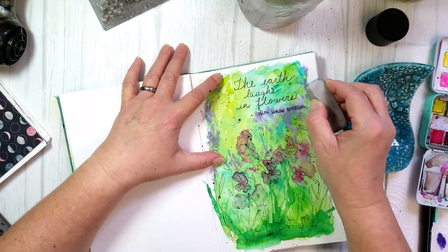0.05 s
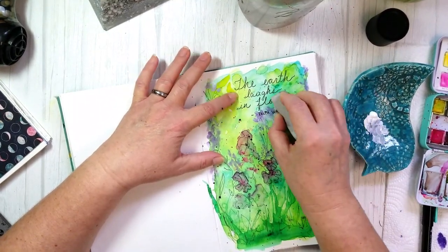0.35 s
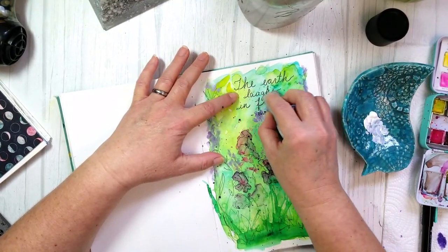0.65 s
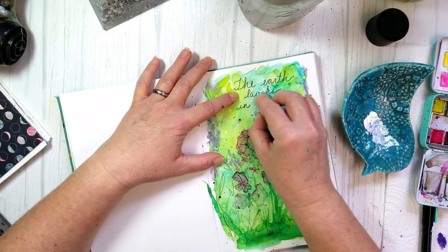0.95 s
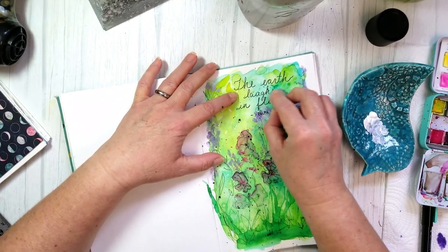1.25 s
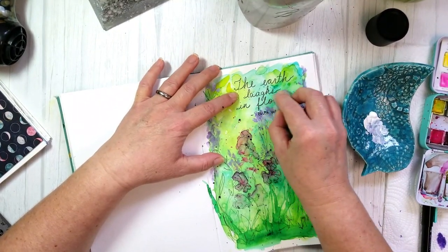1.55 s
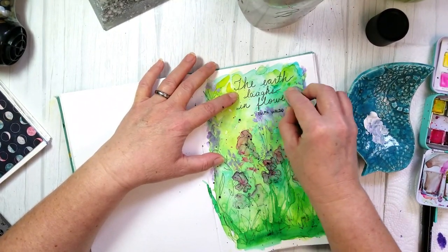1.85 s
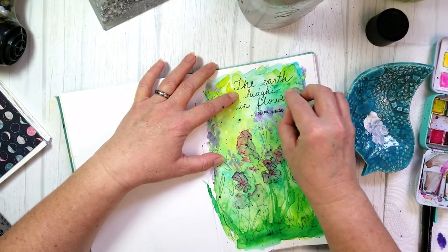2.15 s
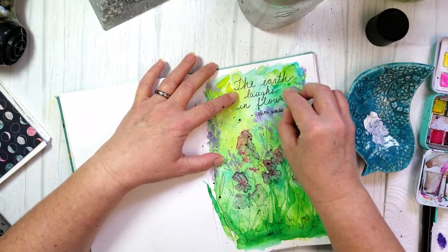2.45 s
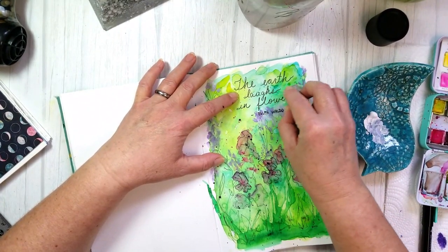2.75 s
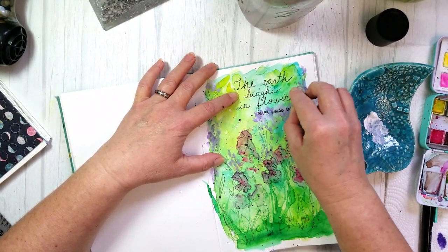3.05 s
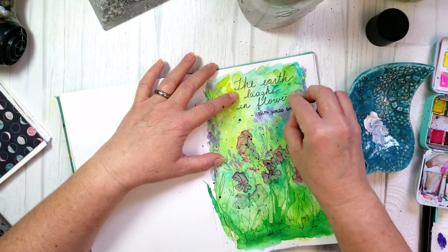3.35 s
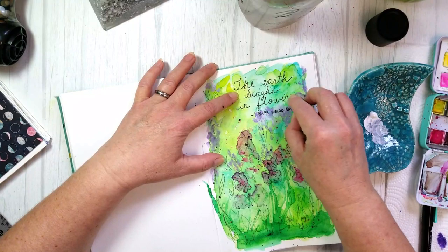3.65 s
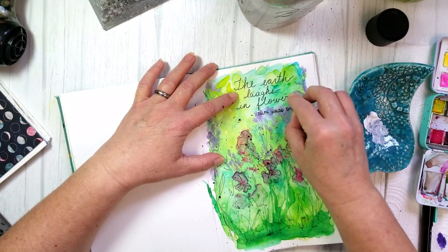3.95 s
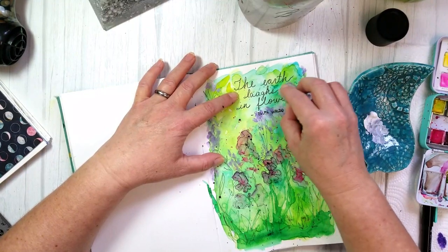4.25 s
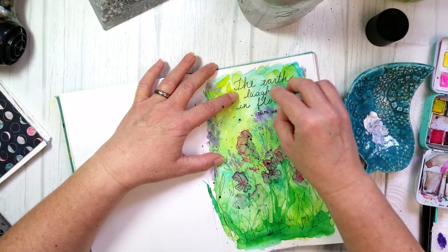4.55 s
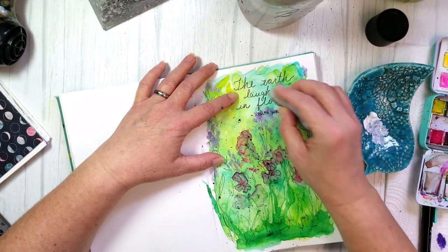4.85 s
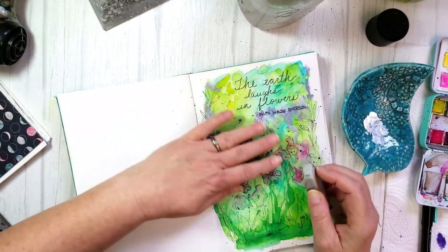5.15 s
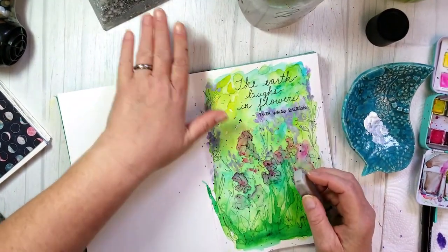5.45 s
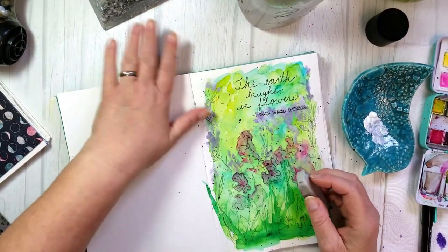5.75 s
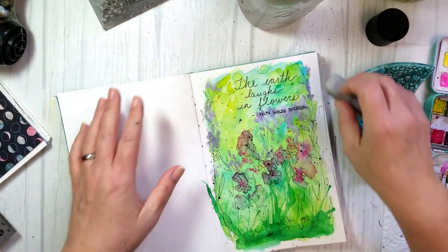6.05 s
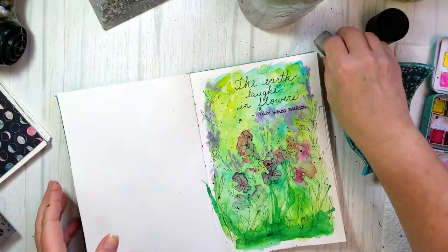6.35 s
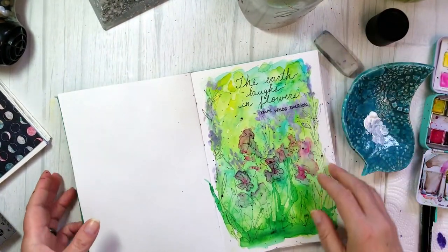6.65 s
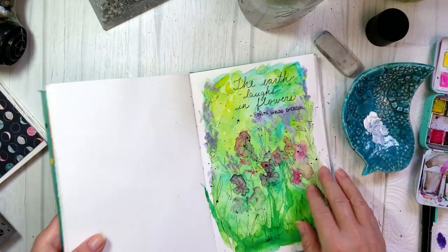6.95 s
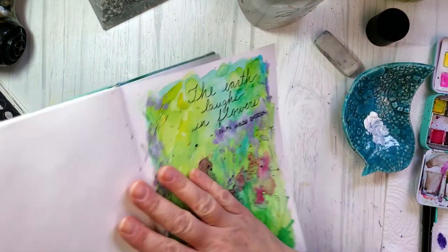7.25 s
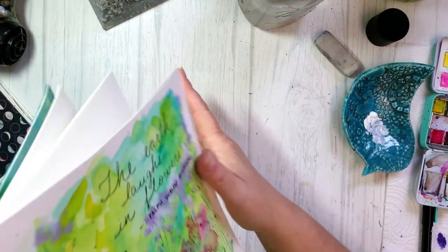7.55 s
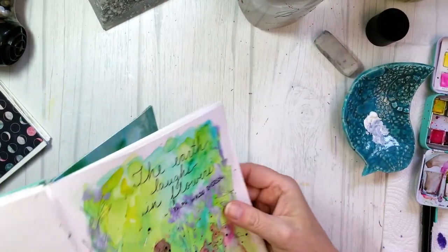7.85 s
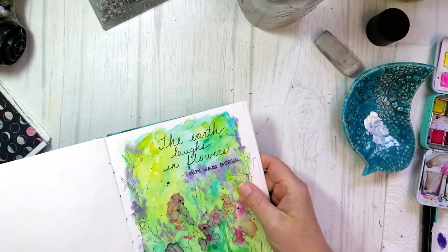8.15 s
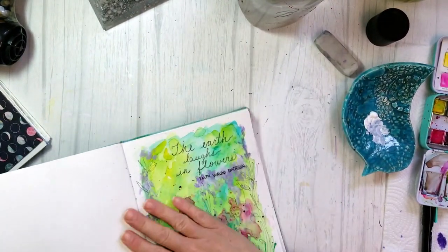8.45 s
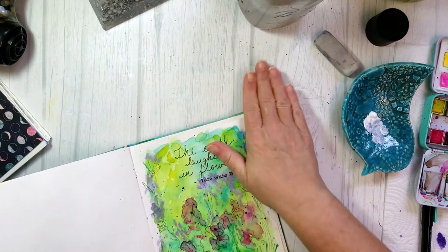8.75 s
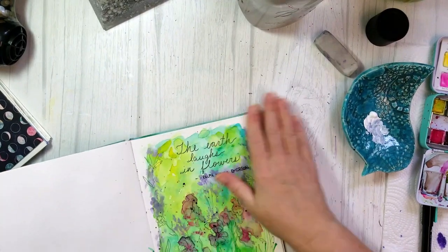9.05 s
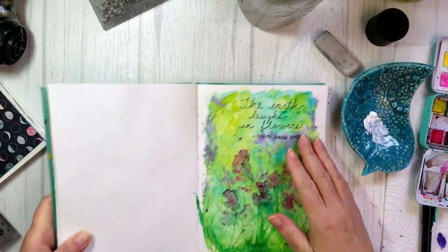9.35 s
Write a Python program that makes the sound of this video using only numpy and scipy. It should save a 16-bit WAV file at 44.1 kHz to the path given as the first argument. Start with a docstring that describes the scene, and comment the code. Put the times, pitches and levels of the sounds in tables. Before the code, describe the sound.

Close up in a small quiet room, rubber rasps softly to and fro over paper for about five seconds. Two louder swishes follow as a palm brushes the page, then a dropped eraser knocks on wood. A sketchbook is moved about with sliding sounds, paper ticks and soft thuds, ending with two more sweeps and a sharp clap of its cover.

```python
"""An eraser rubs quickly to and fro over a sketchbook page on a wooden table, hissing on the paper and
juddering as the rubber sticks and slips. A hand sweeps the crumbs off twice, the eraser is dropped, the
book is slid, tipped up and set down, the page is brushed twice more and the stiff cover claps down.
Rubbing is noise that swells with the speed of the hand; each blow is a crack plus a few fading tones.
It is all heard close up, in stereo, in a small quiet room."""
import sys
import numpy as np
from scipy import signal
from scipy.fft import rfft, irfft
from scipy.io import wavfile
from scipy.ndimage import uniform_filter1d

SR = 44100
rng = np.random.default_rng(int(sys.argv[2]) if len(sys.argv) > 2 else 0)


def inscribe(sig):
    """Save sig as 16-bit PCM at rate SR to the path in sys.argv[1].

    A 1-D sig is mono; a 2-D sig holds one channel per row.
    Samples are clipped to [-1, 1] before scaling.
    """
    pcm = np.round(np.clip(np.atleast_2d(sig).T, -1, 1) * 32767)
    wavfile.write(sys.argv[1], SR, pcm.astype(np.int16))


N = 414981
TIME = np.arange(N) / SR


def from_db(db):
    """Turn decibels into a number to multiply by."""
    return 10 ** (np.asarray(db) / 20)


def unit_level(x):
    """Scale a signal so that its average size (rms) is 1."""
    return x / np.sqrt(np.mean(x ** 2) + 1e-20)


def curve_over_pitch(points, size=N):
    """Join a few (frequency, value) points into a curve over all frequencies."""
    hz, value = np.transpose(points)
    return np.interp(np.log(np.fft.rfftfreq(size, 1 / SR) + 1e-9), np.log(hz), value)


def drift(per_s):
    """A random wobble that heads for a new value per_s times a second."""
    targets = rng.standard_normal(N // 8)
    return unit_level(np.interp(TIME * per_s, np.arange(len(targets)), targets))


def low_pass(x, hz):
    """Dull a sound by turning down what lies above hz."""
    return signal.sosfilt(signal.butter(2, min(hz, .45 * SR), fs=SR, output="sos"), x)


def resonate(x, resonances):
    """Let a sound ring at several pitches at once, every second one flipped in sign."""
    out = 0
    for k, (hz, width_hz, db) in enumerate(resonances):
        r = np.exp(-np.pi * width_hz / SR)
        poles = [1, -2 * r * np.cos(2 * np.pi * hz / SR), r * r]
        out = out + (-1) ** k * from_db(db) * (1 - r * r) / 2 * signal.lfilter([1, 0, -1], poles, x)
    return out / np.std(out.mean(axis=0))


def lean_left(x, balance):
    """Make the left side louder, by an amount that depends on pitch."""
    gain = from_db(curve_over_pitch(balance) / 2 * [[1], [-1]])
    return irfft(rfft(x) * gain / np.sqrt(np.mean(gain ** 2, axis=0)), N)


# how alike left and right are: f/Hz, likeness (1 = the same)
STEREO_LIKENESS = [(150, .99), (300, 0.8), (600, 0.54), (1300, .5), (3000, 0.24), (7000, 0), (15000, 0)]
def stereo_noise(spectrum=((20, 0), (20000, 0)), size=N):
    """Shaped noise, alike on both sides in the bass and unrelated in the treble."""
    shared, apart = rfft(rng.standard_normal((2, size))) * from_db(curve_over_pitch(spectrum, size))
    alike = np.clip(curve_over_pitch(STEREO_LIKENESS, size), -.5, .99)
    apart = apart * np.sqrt((1 - alike) / (1 + alike))
    return irfft([shared + apart, shared - apart], size) / np.std(irfft(shared, size))


# steady background noise: f/Hz, relative level/dB
BACKGROUND_SPECTRUM = [(20, -19.5), (40, -9), (65, 4), (105, -7), (160, -13), (205, -15.5), (240, -4.5),
                       (290, -19), (380, -27), (600, -31), (2000, -36.5), (6000, -41.5), (10000, -40),
                       (15500, -31.5)]
# how far it leans left: f/Hz, left minus right/dB
BACKGROUND_LEAN = [(70, 5), (250, 4.5), (1500, 1), (6000, 4), (13000, 3)]
def background_noise(level_db=-63):
    """Steady background noise: a low hum with a faint high hiss."""
    return from_db(level_db) * lean_left(stereo_noise(BACKGROUND_SPECTRUM), BACKGROUND_LEAN)


def room_echo(x, wall_cut_hz=4000, fade_s=0.2):
    """The walls send back a short, dull tail, different on each side."""
    t = np.arange(SR // 2) / SR
    tail = low_pass(rng.standard_normal((2, len(t))), wall_cut_hz)
    tail = tail * from_db(-60 * t / fade_s) * (t > .004)
    tail = tail / np.sqrt(np.sum(tail ** 2, axis=1, keepdims=True) * SR / 2 / wall_cut_hz)
    return signal.fftconvolve(x, tail, axes=1)[:, :N]


def blows(hits, tones, crack_db, crack_fade_s, crack_low_hz):
    """Each blow makes an object's own tones ring, with a short crack; a soft contact dulls both."""
    out, size = np.zeros((2, N + SR)), SR // 3
    t = np.arange(size) / SR
    hz, tone_db, fade_s = np.transpose(tones)[:, :, None]
    cut_bass = signal.butter(2, crack_low_hz, "high", fs=SR, output="sos")
    for start_s, peak_db, contact_hz in hits:
        strength = from_db(tone_db + rng.standard_normal(hz.shape)) * rng.choice([-1, 1], hz.shape)
        ring = np.sum(strength * np.sin(2 * np.pi * hz * t) * from_db(-60 * t / fade_s), axis=0)
        crack = stereo_noise(size=size) * from_db(crack_db - 60 * t / crack_fade_s)
        blow = low_pass(ring + signal.sosfilt(cut_bass, crack), contact_hz)
        at = round(start_s * SR)
        out[:, at:at + size] += from_db(peak_db) * blow / np.abs(blow.mean(axis=0)).max()
    return out[:, :N]


# soft bumps: t/s, peak level/dB, dulled above f/Hz
THUD_HITS = [(.276, -33, 890), (.438, -46.5, 390), (5.402, -33, 465), (5.654, -36, 220), (5.742, -40, 350),
             (6.289, -34, 302.8), (6.725, -39, 397), (7.292, -41, 900), (7.5, -42.5, 182),
             (7.692, -37.5, 300), (7.955, -26.5, 794), (7.963, -31, 298), (8.014, -33, 850),
             (8.027, -29.5, 700), (8.134, -39, 430), (8.296, -38.5, 506), (8.578, -29.5, 178),
             (8.664, -39, 200), (8.978, -31.5, 294), (9.1, -37, 450)]
# the book's tones: f/Hz, relative level/dB, time to fade by 60 dB/s
BOOK_TONES = [(75.5, -1.5, 0.17), (123.4, 0.5, 0.22), (166.4, 6.5, 0.068), (236.8, 0.5, 0.069),
              (300.2, -0.5, 0.16), (450, -4, 0.16), (724, -18, 0.029), (860, -11, 0.14)]
def book_thuds():
    """Hands and book bump softly, and the book answers with low tones."""
    return blows(THUD_HITS, BOOK_TONES, crack_db=16.0, crack_fade_s=0.15, crack_low_hz=50.3)


# knocks on wood: t/s, peak level/dB, dulled above f/Hz
KNOCK_HITS = [(6.272, -24, 350), (6.288, -22, 580), (6.311, -28.5, 295), (6.356, -33, 490),
              (6.386, -38.5, 517), (6.551, -41, 600), (6.571, -42.5, 450), (6.707, -38, 600),
              (6.728, -36, 700), (6.748, -38, 500)]
# the table's tones: f/Hz, relative level/dB, time to fade by 60 dB/s
TABLE_TONES = [(227.6, 1, 0.1), (301.5, 0, 0.14), (358, -0.5, 0.12), (441, 2.5, 0.081), (497, -6, 0.034),
               (600, -6, 0.14), (670, -7.5, 0.051), (1030, -11, 0.061), (1674, -22, .035), (2750, -3, 0.07)]
def table_knocks():
    """The tumbling eraser and the fingers make the wooden table ring."""
    return blows(KNOCK_HITS, TABLE_TONES, crack_db=7.0, crack_fade_s=0.15, crack_low_hz=90)


# claps: t/s, peak level/dB, dulled above f/Hz
CLAP_HITS = [(.277, -43, 1500), (4.828, -54, 3030), (4.999, -53, 1520), (5.12, -44, 1580),
             (7.954, -52, 1200), (8.244, -42, 1800), (8.258, -33.5, 1490), (8.294, -37, 1510),
             (8.59, -34.5, 1200), (8.974, -29, 2000), (9.099, -17, 2260)]
# the cover's tones: f/Hz, relative level/dB, time to fade by 60 dB/s
COVER_TONES = [(350, -11, 0.028), (763, -9, 0.06), (828, -5.5, 0.055), (1024, -2, 0.033),
               (1240, -0.5, 0.022), (1397, -5.5, 0.0098), (1436, -2.5, 0.033), (1960, -23, 0.024),
               (2466, -9.5, 0.044), (4380, -31, 0.092)]
def cover_claps():
    """The stiff cover and the pages clap together and ring briefly."""
    return blows(CLAP_HITS, COVER_TONES, crack_db=3.5, crack_fade_s=0.074, crack_low_hz=614)


# snaps: t/s, peak level/dB, dulled above f/Hz
SNAP_HITS = [(.436, -37, 11900), (4.828, -58, 6000), (5.635, -39.5, 14000), (6.289, -37, 3580),
             (7.822, -27, 15600), (7.84, -33, 4000), (7.886, -40, 7000), (8.427, -33, 15000),
             (8.876, -57.5, 9000), (8.931, -57, 9000), (8.973, -29.5, 15400), (9.099, -28, 7150)]
# the page's tones: f/Hz, relative level/dB, time to fade by 60 dB/s
PAGE_TONES = [(1460, -5.5, 0.045), (2500, 4, 0.014), (2850, 1, 0.037), (4300, -2.5, 0.015),
              (5930, -27, .03)]
def paper_snaps():
    """Paper snaps under a fingertip with a short, bright tick."""
    return blows(SNAP_HITS, PAGE_TONES, crack_db=5.0, crack_fade_s=0.027, crack_low_hz=700)


# squeaks: middle t/s, length/s, first f/Hz, last f/Hz, level/dB
SQUEAK_GLIDES = [(5.118, .07, 1308, 1490, -47.5), (5.327, .05, 4270, 4380, -36),
                 (5.346, .1, 3057, 2650, -40), (6.63, .08, 600, 680, -62), (6.725, .08, 2600, 2850, -55.5),
                 (6.795, .13, 700, 1004, -59), (7.051, 0.071, 5050, 5000, -63),
                 (7.404, .08, 1435, 1460, -40.5), (8.025, .07, 2580, 2670, -57),
                 (8.447, .06, 2450, 2260, -48)]
def squeaks(width_hz=130):
    """A rubbed surface sings hoarsely for a moment: a wavering tone that swells and glides."""
    out = np.zeros((2, N))
    waver = low_pass(stereo_noise() + 1j * stereo_noise(), width_hz)  # shakes loudness and pitch
    waver = unit_level(waver.view(float)).view(complex)
    for middle_s, length_s, first_hz, last_hz, db in SQUEAK_GLIDES:
        at, size = round((middle_s - length_s / 2) * SR), round(length_s * SR)
        tone = np.exp(2j * np.pi * np.cumsum(np.linspace(first_hz, last_hz, size)) / SR)
        out[:, at:at + size] += from_db(db) * np.hanning(size) * np.real(tone * waver[:, at:at + size])
    return out


def paper_grain(depth_db, grains_per_s):
    """Countless fibres snag and let go, so the loudness of rubbing is never quite even."""
    return unit_level(from_db(depth_db * drift(grains_per_s)))


def hand_echo(x, gap_s, wander, wander_per_s, strength):
    """Sound also bounces off the moving hand a little later, so the colour of the hiss keeps shifting."""
    now = np.arange(N)
    echo = [np.interp(now - SR * gap_s * np.exp(wander * drift(wander_per_s)), now, side) for side in x]
    return (x + strength * np.array(echo)) / np.hypot(1, strength)


def hollow_noise(resonances, low_hz, high_hz):
    """Rubbing noise rings in the pocket of air under the hand."""
    band = signal.butter(2, [low_hz, high_hz], "band", fs=SR, output="sos")
    return resonate(signal.sosfilt(band, stereo_noise()), resonances)


# the book's rumble: f/Hz, relative level/dB
RUMBLE_SPECTRUM = [(40, -15), (70, 4), (130, 6), (200, -7.5), (290, -3.5), (400, -13.5), (600, -15.5),
                   (1000, -26), (2000, -63.5)]
def book_rumble():
    """Rubbing and sliding shake the book, which gives a low noise."""
    return stereo_noise(RUMBLE_SPECTRUM)


def slide_speed(start_s, fastest_s, end_s, touch_speed):
    """One movement touches down already moving, speeds up to 1 and slows to rest."""
    angle = np.interp(TIME, [start_s, fastest_s, end_s], [np.arcsin(touch_speed), np.pi / 2, np.pi])
    return np.abs(np.sin(angle)) * (TIME >= start_s) * (TIME < end_s)


# slides of hand and book: start t/s, fastest t/s, end t/s, speed at first touch (0-1),
# then relative level/dB of the hiss, of the hollow ring and of the rumble
SWEEP_MOVES = [(4.988, 5.123, 5.299, 0.45, -57.0, -59.0, -65.5),
               (5.246, 5.339, 5.425, 0.07, -33.5, -35.5, -53.5),
               (5.634, 5.699, 5.786, 0.28, -35.0, -38.0, -52.5),
               (5.761, 5.808, 5.916, 0.1, -59.0, -60.5, -65.5),
               (6.167, 6.324, 6.572, 0.17, -78.0, -67.0, -65.5),
               (6.603, 6.763, 6.84, 0.15, -65.0, -54.5, -61.0),
               (6.773, 6.864, 6.904, 0.28, -50.0, -50.0, -60.5),
               (6.878, 6.983, 7.037, 0.53, -60.0, -57.0, -72.5),
               (6.988, 7.129, 7.289, 0.72, -60.0, -77.5, -71.0),
               (7.156, 7.181, 7.385, 0.74, -55.0, -46.5, -68.0),
               (7.277, 7.433, 7.633, 0.27, -36.0, -39.0, -60.0),
               (7.608, 7.645, 7.712, 0.1, -50.5, -50.0, -69.0),
               (7.684, 7.778, 7.816, 0.45, -53.0, -48.0, -56.5),
               (7.82, 7.838, 7.949, 0.9, -54.0, -47.5, -56.5),
               (7.926, 8.01, 8.104, 0.43, -56.0, -48.0, -52.0),
               (8.076, 8.112, 8.229, 0.41, -61.5, -57.0, -60.0),
               (8.195, 8.273, 8.336, 0.18, -50.0, -45.0, -57.0),
               (8.323, 8.345, 8.367, 0.18, -47.0, -41.5, -62.0),
               (8.424, 8.465, 8.552, 0.83, -46.0, -44.5, -60.5),
               (8.503, 8.586, 8.651, 0.19, -38.0, -42.5, -57.0),
               (8.568, 8.673, 8.804, 0.04, -32.0, -38.0, -43.0),
               (8.977, 9.031, 9.103, 0.36, -34.5, -43.5, -53.5),
               (9.104, 9.374, 9.7, 0.68, -63.0, -63.0, -71.0)]
# skin on paper: f/Hz, relative level/dB
SKIN_SPECTRUM = [(500, -10.5), (1060, -32), (1800, -5), (2700, -3), (4200, -1.5), (5500, -2.5),
                 (7700, -0.5), (9400, -3.5), (12000, -1.5), (15600, 1)]
# the air pocket under a flat palm: f/Hz, width/Hz, relative level/dB
PALM_POCKET = [(795, 750, -2.5), (1370, 720, 2), (1840, 300, 3.5), (2590, 1500, -3)]
def sweeps(smooth_s=0.00227):
    """The palm brushes the page and the book slides on the table; faster is louder and brighter."""
    power = np.zeros((3, N))
    growth = np.array([[2.1], [1.6], [.8]])  # how steeply hiss, hollow ring and rumble grow with speed
    for start_s, fastest_s, end_s, touch_speed, *levels_db in SWEEP_MOVES:
        speed = slide_speed(start_s, fastest_s, end_s, touch_speed)
        moving = speed > 0
        power[:, moving] += (from_db(levels_db)[:, None] * speed[moving] ** growth) ** 2
    hiss, hollow, rumble = uniform_filter1d(np.sqrt(power), round(smooth_s * SR))
    holding = (TIME > 6.65) & (TIME < 8.8)  # the book rustles and rumbles faintly in the hands
    hiss = np.hypot(hiss, holding * from_db(-69.5))
    rumble = np.hypot(rumble, holding * from_db(-69))
    brush = hiss * from_db(3.5) * stereo_noise(SKIN_SPECTRUM)
    brush += hollow * from_db(-5.5) * hollow_noise(PALM_POCKET, low_hz=600, high_hz=3800)
    brush *= paper_grain(depth_db=1.18, grains_per_s=180)
    brush = hand_echo(brush, gap_s=.0016, wander=0.284, wander_per_s=5, strength=0.64)
    return brush + rumble * book_rumble()


def judder(strokes, delay_s=.03, length_s=0.0786, jitter=0.133, cut_hz=330, tone_width_hz=90):
    """Soon after each push begins the rubber sticks and slips, and every slip shakes the book."""
    out = np.zeros(N)
    unsteady = np.exp(jitter * drift(120))
    book = [(hz, tone_width_hz, db) for hz, db, _ in BOOK_TONES]
    for push_s, _, _, _, db, slips_per_s in strokes:
        at, size = round((push_s + delay_s) * SR), round(length_s * SR)
        slips = np.cumsum(slips_per_s * unsteady[at:at + size]) / SR
        strain = slips % 1 - .5  # builds slowly, lets go at once
        strain = np.pad(strain * signal.windows.tukey(size, .5), (0, SR // 20))
        shake = low_pass(resonate(strain[None], book)[0], cut_hz)
        out[at:at + len(shake)] += from_db(db) * shake / np.sqrt(np.sum(shake ** 2) / size)
    return out


# one to-and-fro a row: push t/s, pull t/s, relative push level/dB, relative pull level/dB,
# judder level/dB, slip rate f/Hz
ERASER_STROKES = [(0.023, 0.086, -73, -69.5, -75, 210), (0.175, 0.371, -60.5, -68.5, -69, 210),
                  (0.452, 0.615, -60.0, -62, -73, 230), (0.735, 0.889, -57.5, -61, -62.5, 284),
                  (1.058, 1.171, -61, -57, -66, 250), (1.346, 1.48, -61.5, -59.5, -64.0, 260),
                  (1.626, 1.754, -64.5, -60.5, -65.5, 246), (1.907, 2.036, -65.5, -64.0, -65.5, 187),
                  (2.167, 2.306, -64.5, -63.5, -59.0, 243), (2.451, 2.596, -68.0, -62, -66, 235),
                  (2.731, 2.862, -65, -64.5, -61.0, 257.0), (3.027, 3.159, -71.5, -68.5, -67.0, 234),
                  (3.292, 3.412, -69.5, -69, -64.5, 257.0), (3.545, 3.684, -70.0, -69.0, -64, 230),
                  (3.807, 3.971, -68, -65, -66, 265), (4.086, 4.26, -63, -67.5, -58.5, 256),
                  (4.36, 4.564, -62.5, -63.5, -64.5, 177.0), (4.671, 4.834, -59.5, -76.5, -57.5, 175)]
# rubber on paper: f/Hz, relative level/dB
RUBBER_SPECTRUM = [(700, -39), (1300, -16.5), (2200, -10), (2700, -6), (2870, 0.5), (3080, -8.5),
                   (4000, -9), (5200, -6.5), (7500, -6), (9300, -8.5), (11500, -5), (15500, -6.5)]
# the air pocket under the hand as it pushes and as it pulls: f/Hz, width/Hz, relative level/dB
PUSH_POCKET = [(1210, 370, -1.5), (2100, 360, -1), (2550, 300, 2), (4630, 1800, -7)]
PULL_POCKET = [(1240, 440, 3.8), (3030, 110, 1.4), (3430, 1100, 0.5)]
def eraser(end_s=4.99, rest_share=0.046, hiss_floor=0.2, hollow_fade_db_per_s=2, drag_db=-66):
    """Rubber scrapes over paper, loudest in mid-stroke; push and pull each have their own hollow ring."""
    rows = np.array(ERASER_STROKES)
    starts, levels_db = rows[:, :2].ravel(), rows[:, 2:4].ravel()
    strokes_done = np.interp(TIME, np.append(starts, end_s), np.arange(len(starts) + 1))
    stroke = np.minimum(strokes_done.astype(int), len(starts) - 1)
    pushing = stroke % 2 == 0
    travel = np.clip((strokes_done % 1 - rest_share) / (1 - 2 * rest_share), 0, 1)
    speed = np.abs(np.sin(np.pi * travel))  # the hand rests at each turn
    faint_hiss = hiss_floor * from_db(np.interp(TIME, starts, levels_db)) * (TIME < end_s)
    bite = np.sin(np.pi * np.clip((TIME - .294) / .054, 0, 1))  # a scuff as the rubber first grips
    hiss = from_db(-0.5) * (speed * from_db(levels_db[stroke]) + faint_hiss) + bite * from_db(-59.5)
    hollow_db = levels_db[stroke] + np.where(pushing, -3, -7.5) - hollow_fade_db_per_s * TIME
    hollow = speed * from_db(hollow_db) + bite * from_db(-52)
    rumble = speed * from_db(drag_db) + bite * from_db(-52)
    push_ring = hollow_noise(PUSH_POCKET, low_hz=960, high_hz=5000)
    pull_ring = hollow_noise(PULL_POCKET, low_hz=900, high_hz=4200)
    grain = paper_grain(depth_db=0.8, grains_per_s=640)
    rub = grain * (hiss * stereo_noise(RUBBER_SPECTRUM) + hollow * np.where(pushing, push_ring, pull_ring))
    rub = hand_echo(rub, gap_s=0.000888, wander=0.363, wander_per_s=8, strength=0.46)
    return rub + rumble * book_rumble() + judder(ERASER_STROKES)


# how far the rubbing and the other close sounds lean left: f/Hz, left minus right/dB
ERASER_LEAN = [(80, 5), (350, 5.2), (1300, 3.8), (3000, 5.3), (7500, 2.3), (12000, 4.2)]
HANDLING_LEAN = [(60, 3), (300, 2.1), (600, 4.5), (1500, 3), (4500, 3.4), (8000, 1.5), (12000, 7),
                 (15500, 6)]
def scene(echo_db=-8.5):
    """Blows, rubbing and brushing at the table, with the room's echo, over steady background noise."""
    hits = book_thuds() + table_knocks() + cover_claps() + paper_snaps()
    close = lean_left(eraser(), ERASER_LEAN)
    close += lean_left(sweeps() + squeaks() + hits, HANDLING_LEAN)
    return background_noise() + close + from_db(echo_db) * room_echo(close)


def record(dry, cutoff_hz=15900):
    """Cut the very highest treble steeply."""
    return signal.sosfilt(signal.ellip(12, .1, 80, cutoff_hz, fs=SR, output="sos"), dry)


dry = scene()
out = record(dry)
inscribe(out)
```